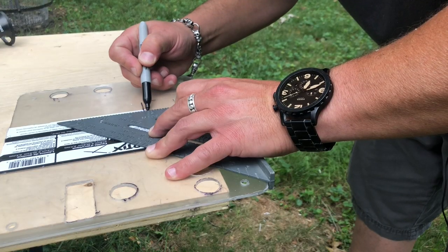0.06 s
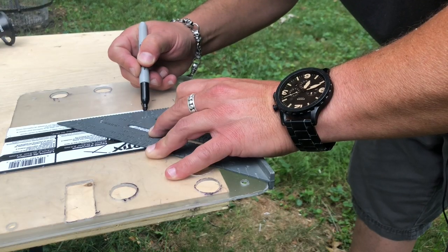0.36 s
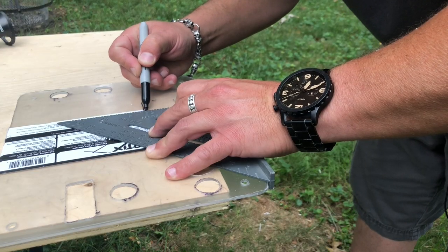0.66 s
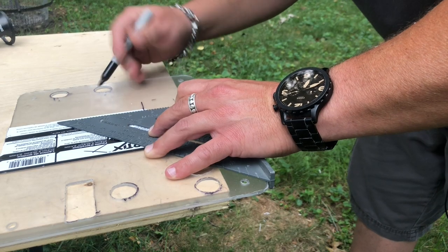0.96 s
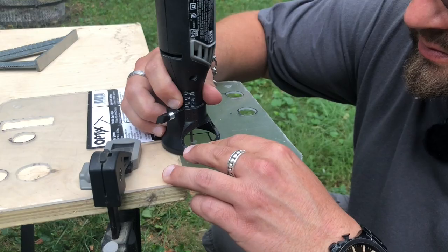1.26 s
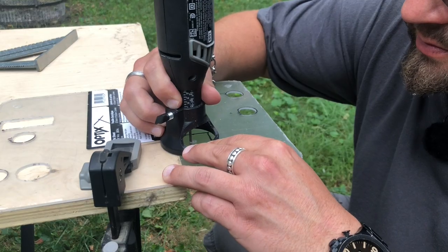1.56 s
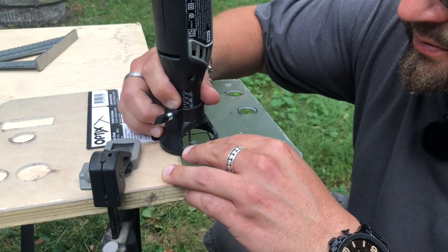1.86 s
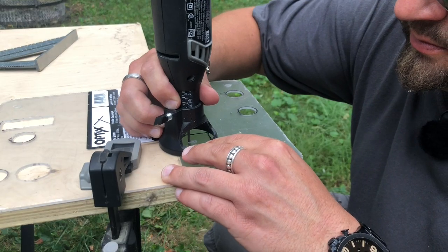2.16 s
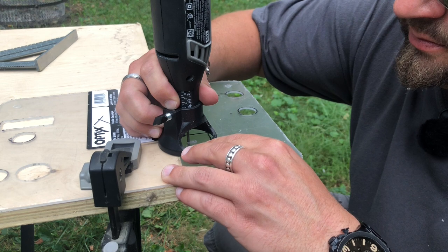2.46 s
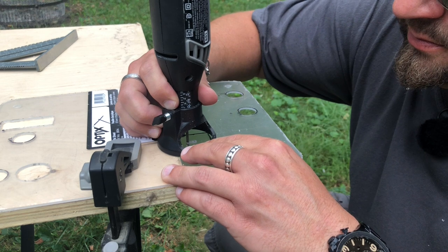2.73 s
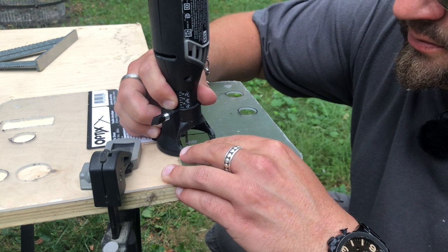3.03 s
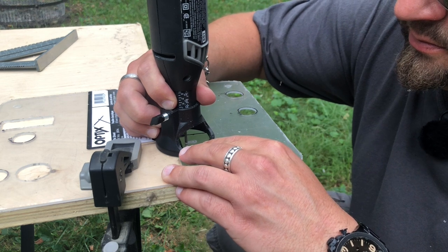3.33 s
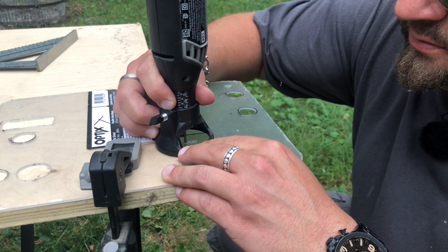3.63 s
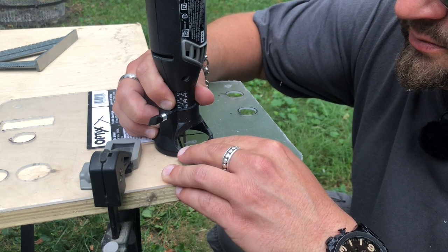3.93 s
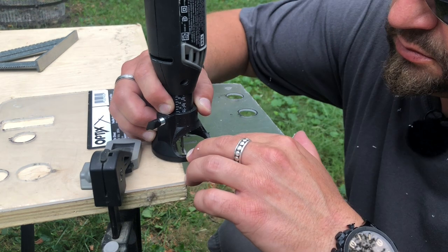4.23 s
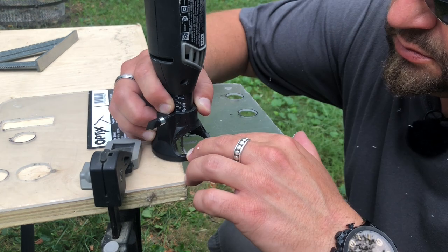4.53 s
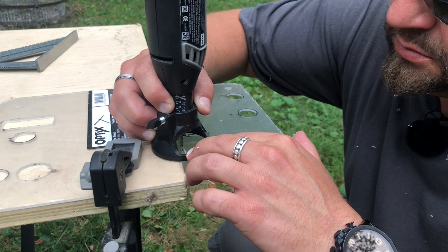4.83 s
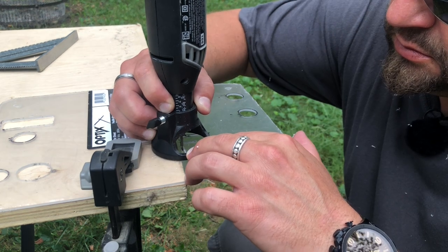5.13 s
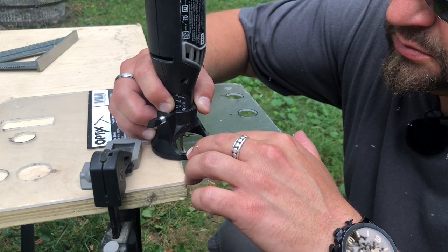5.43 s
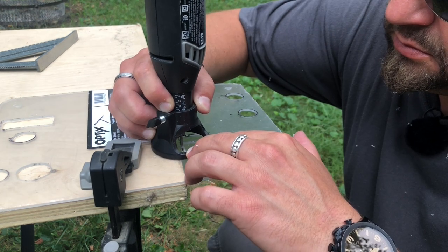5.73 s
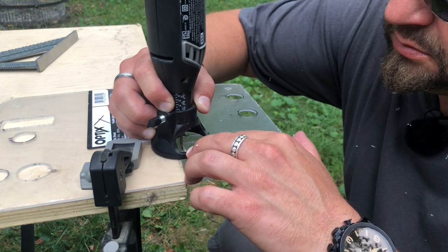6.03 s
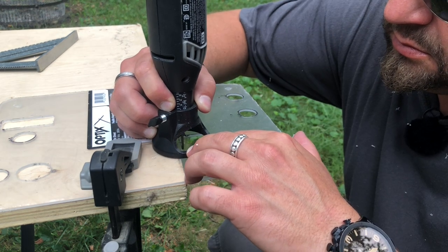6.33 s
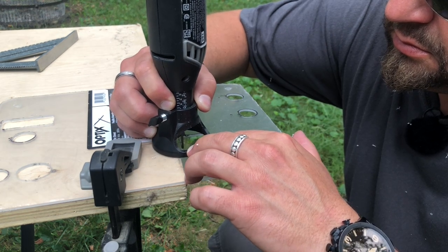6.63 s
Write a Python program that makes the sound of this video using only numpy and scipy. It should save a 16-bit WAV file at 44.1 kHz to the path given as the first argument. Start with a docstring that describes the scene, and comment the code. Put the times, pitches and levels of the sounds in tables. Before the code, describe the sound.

A felt pen ticks faintly on plastic, then a rotary tool cuts the panel with a high whine, rasping and squealing chatter.

```python
"""A rotary tool cuts a plastic panel in two abrupt passes at an outdoor workbench, after a felt pen
ticks and squeaks across it. The two-fluted bit strikes twice a turn and chatters in the slot, so the
cut rasps and squeals and the sheet rings. The second pass is smoother; the bit catches, breaks free
and grazes the rim while the unloaded motor speeds up. A low outdoor rumble lies underneath."""
import sys
import numpy as np
from scipy import signal
from scipy.fft import rfft, irfft, next_fast_len
from scipy.io import wavfile
from scipy.ndimage import uniform_filter1d

SR = 44100
rng = np.random.default_rng(int(sys.argv[2]) if len(sys.argv) > 2 else 0)


def put_to_file(sound):
    """Save the sound as 16-bit audio at rate SR, in the file named by the first command-line argument."""
    columns = np.atleast_2d(sound).T  # one column per channel
    safe = np.clip(columns, -1, 1)
    whole_steps = np.round(safe * 32767)
    wavfile.write(sys.argv[1], SR, whole_steps.astype(np.int16))


N = 303584
T = np.arange(N) / SR
START_S, SECOND_S, FREE_S, STOP_S = 1.192, 4.232, 6.17, 6.768  # tool in, second pass, bit free, tool out


def amp(db):
    """Decibels to gain."""
    return 10 ** (np.asarray(db) / 20)


def unit(x):
    """Scales to rms 1."""
    return x / np.sqrt(np.mean(x ** 2) + 1e-20)


def curves(rows):
    """Breakpoint envelopes, one for each column after the time."""
    times, *columns = np.transpose(rows)
    return [np.interp(T, times, column) for column in columns]


def between(start_s, end_s):
    """A gate with 9 ms fades."""
    return np.clip((T - start_s) / .009 + .5, 0, 1) * np.clip((end_s - T) / .009 + .5, 0, 1)


def swell(peak_s, half_s):
    """A bell-shaped envelope of height 1."""
    return np.exp(-((T - peak_s) / half_s) ** 2)


def since(start_s):
    """Seconds since start_s, zero before it."""
    return np.maximum(T - start_s, 0)


def noise():
    """White noise of rms 1."""
    return rng.standard_normal(N)


def wander(hz):
    """Random modulation of rms 1, up to about hz."""
    size = next_fast_len(N)
    f = np.fft.rfftfreq(size, 1 / SR)
    return unit(irfft(rfft(noise(), size) / (1 + (f / hz) ** 4), size)[:N])


def colour(x, eq, modes=(), size=4096):
    """A minimum-phase EQ: a broad curve with ringing resonances on top."""
    f = np.fft.rfftfreq(size, 1 / SR)
    hz, db = np.transpose(eq)
    shape = np.interp(np.log(f + 1), np.log(hz), db)
    for centre, width, boost in modes:
        shape = shape + boost / (1 + (2 * (f - centre) / width) ** 2)
    log_gain = np.log(amp(np.r_[shape, shape[-2:0:-1]]))
    taps = np.fft.ifft(np.exp(np.conj(signal.hilbert(log_gain)))).real
    return signal.oaconvolve(x, taps)[:N]


def tones(turns, harmonics, waver_db):
    """Sines locked to the shaft, each wavering in level by itself."""
    out = 0
    for harmonic, db in harmonics:
        gain = np.sqrt(2) * amp(db + waver_db * wander(10.6))
        out = out + gain * np.sin(2 * np.pi * (harmonic * turns + rng.random()))
    return out


# outdoor bed EQ: freq_hz, gain_db
YARD_EQ = [(25, -8), (55, -3.5), (105, 1), (180, -10.5), (280, -4.5), (450, -19), (1000, -25.5),
           (3000, -33.5), (7300, -30.5), (15500, -45)]

def yard(level_db=-59.5, duck_db=-13):
    """A low outdoor rumble, ducked while the tool runs."""
    return amp(level_db + duck_db * between(START_S, STOP_S)) * unit(colour(noise(), YARD_EQ))


# felt-tip strokes: start_s, length_s, pitch_hz, level_db
PEN_STROKES = [(.012, 0.038, 4870, -67), (.512, .025, 4800, -71), (.555, .03, 4800, -69),
               (.608, 0.042, 4900, -69)]

def pen_squeaks():
    """The felt sticks and slips on the plastic, falling in pitch through each stroke."""
    out = 0
    for start_s, length_s, pitch_hz, level_db in PEN_STROKES:
        stroke = np.clip((T - start_s) / length_s, 0, 1)
        glide_hz = pitch_hz * (1 - .09 * (stroke - .5) + .015 * wander(400))
        out = out + amp(level_db) * np.sin(np.pi * stroke) * np.sin(2 * np.pi * np.cumsum(glide_hz) / SR)
    return out


# soft thumps: start_s, level_db, pitch_hz
PANEL_BUMPS = [(0.087, -49, 110), (6.834, -49, 151), (6.855, -55, 106)]

def panel_bumps(decay_s=.013):
    """Hands bump the panel, which gives a low, damped note."""
    return sum(amp(db) * np.exp(-since(s) / decay_s) * np.sin(2 * np.pi * hz * since(s))
               for s, db, hz in PANEL_BUMPS)


# ticks and brushes: start_s, level_db, t60_s
PANEL_TICKS = [(0.181, -52, .018), (.4704, -63, .06), (.6206, -60, .05), (.7897, -65, .02),
               (0.841, -58, .025), (.858, -62, .07), (1.0226, -58.5, 0.054), (1.079, -61, 0.011),
               (1.1085, -58, .015), (1.1544, -58, 0.052), (6.776, -65.5, 0.94)]
# their EQ: freq_hz, gain_db
TICK_EQ = [(500, -6), (2500, -7.5), (5000, -1), (6200, -8), (7400, -2.5), (13500, -15), (16000, -27)]

def panel_ticks():
    """Pen and hand touch the plastic in bright, decaying bursts of noise."""
    envelope = sum(amp(db - 60 * since(s) / t60_s) * (T >= s) for s, db, t60_s in PANEL_TICKS)
    return envelope * unit(colour(noise(), TICK_EQ))


# flute blows under load in each pass, two to a turn: time_s, rate_hz
FIRST_BLOW_RATE = [(1.22, 689), (1.37, 686.7), (1.82, 687.3), (2.02, 682.7), (3.9, 691.5), (4.01, 696),
                   (4.2, 697)]
SECOND_BLOW_RATE = [(4.27, 687.1), (5.184, 686), (6.068, 691.6), (6.17, 699.5)]

def shaft_speed(run_up_hz=35, run_up_s=.36):
    """Turns per second: the load holds the motor down until the bit breaks free."""
    blows_hz, = curves([*FIRST_BLOW_RATE, *SECOND_BLOW_RATE])
    return blows_hz / 2 + run_up_hz * (1 - np.exp(-since(FREE_S) / run_up_s))


# motor and fan, loaded bit, unloaded bit: shaft_harmonic, level_db
WHIRR_TONES = [(8, -74), (12, -67), (21, -67), (23, -66)]
HUM_TONES = [(2, -52)]
IDLE_TONES = [(1, -72.5), (2, -71.5), (3, -64)]
# cooling air EQ: freq_hz, gain_db
AIR_EQ = [(100, -26), (500, 2), (1100, 0), (2600, 0.5), (3500, -7), (5900, 6), (7500, 4), (8800, -14),
          (12000, -7), (15500, -27)]

def motor(turns, speed_hz, air_db=-52, whistle_load_db=4.5, thrum_db_per_hz=1.8):
    """Motor tones and cooling air; as the load lets go, the hum gives way to a higher idle tone."""
    load = np.interp(speed_hz, [349, 353], [1, 0])
    whirr = tones(turns, WHIRR_TONES, waver_db=1)
    whistle = amp(whistle_load_db * load) * tones(turns, [(24, -52.5)], waver_db=1)
    hum = load * tones(turns, HUM_TONES, waver_db=1.3)
    strain = amp(thrum_db_per_hz * (344.3 - speed_hz))  # grows as the motor slows
    thrum = strain * tones(turns, [(1, -64.5)], waver_db=2.5)
    idle = (1 - load) * tones(turns, IDLE_TONES, waver_db=2)
    air = amp(air_db) * unit(colour(noise(), AIR_EQ))
    return (whirr + whistle + hum + thrum + idle + air) * between(START_S, STOP_S)


def chatter(depth, rate_hz, unevenness):
    """The tool bounces in the slot: each bite builds up, drags the bit back and lets go."""
    angle = 2 * np.pi * np.cumsum(rate_hz * np.exp(unevenness * wander(19.7))) / SR
    bite = depth * np.tanh(1.3 * (np.cos(angle) + .6 * np.sin(2 * angle)))
    drag = depth * np.sin(angle)
    return bite, drag


def whirl_lag(depth, whirl_hz=6):
    """Turns lost against the shaft as the chattering bit rolls backwards round the slot."""
    return np.cumsum(whirl_hz * depth) / SR


def sheet_chirp(x, delay_at_1khz_s=.022, size=4096):
    """Bending waves travel faster at high pitch, so the sheet smears each blow into a chirp."""
    f = np.fft.rfftfreq(size, 1 / SR)
    phase = 4 * np.pi * delay_at_1khz_s * np.sqrt(1000 * f)
    return signal.oaconvolve(x, irfft(np.exp(-1j * phase)))[:N]


def flutes(turns, lopsided, scatter_db, jitter_s, scrape_db):
    """Two blows a turn, one harder than the other, each followed by the scrape of a chip."""
    cycles = 2 * turns
    count = int(cycles[-1])
    scatter, late = rng.standard_normal((count, 2)).T
    force = amp(scatter_db * scatter) * (1 + lopsided * (-1) ** np.arange(count))
    at = (np.interp(np.arange(count), cycles, T) + jitter_s * late) * SR
    near = at.astype(int)[:, None] + np.arange(-5, 7)
    offset = near - at[:, None]
    clicks = force[:, None] * np.sinc(offset) * np.sinc(offset / 6)  # placed between samples
    blows = np.bincount(np.clip(near, 0, N - 1).ravel(), clicks.ravel(), N)
    chips = noise() * (1.4 + np.exp(-(cycles % 1) / .3))
    return sheet_chirp(unit(blows)) + amp(scrape_db) * unit(chips)


def rasp_and_ring(body, bite, rasp_db, ring_db, rasp_throb_db, ring_throb_db, crossover_hz=3300):
    """The struck sheet rings below the crossover and rasps above it; bites can pump each band."""
    low, high = (signal.butter(4, crossover_hz, kind, fs=SR, output="sos") for kind in ("low", "high"))
    ring = signal.sosfilt(low, body) * amp(ring_throb_db * bite + 1.82 * wander(61))
    rasp = signal.sosfilt(high, body) * amp(rasp_throb_db * bite + 2.14 * wander(47))
    return amp(ring_db) * unit(ring) + amp(rasp_db) * unit(rasp)


def squeal(drive, bite, pitch_hz=4777, width_hz=106, throb_db=9):
    """The bit's bending mode flares at every bite, levelled over half a second."""
    mode = signal.lfilter(*signal.iirpeak(pitch_hz, pitch_hz / width_hz, SR), drive)
    flaring = mode * amp(throb_db * bite)
    return flaring / np.sqrt(uniform_filter1d(flaring ** 2, size=SR // 2) + 1e-12)


# the bit biting, and skipping on the surface: shaft_harmonic, relative_db
BITE_TONES = [(8, -20.5), (10, -21), (12, -13), (15, -13.5), (18, -17), (21, -25.5), (22, -13)]
SKIP_TONES = [(6, -11), (8, -15), (18, -9)]

def scream(tip, bite, skip_depth, throb_db=6):
    """Overtones flare with every bite, with an extra layer while the bit skips."""
    biting = tones(tip, BITE_TONES, waver_db=1.5)
    skipping = skip_depth * tones(tip, SKIP_TONES, waver_db=2)
    return amp(throb_db * bite) * (biting + skipping)


# whine at entry: shaft_harmonic, relative_db
ENTRY_TONES = [(6, -2.5), (8, -3.5), (12, 0), (16, -1.5), (18, -5.5), (22, -6)]
# whine at full depth: shaft_harmonic, level_db
SLOT_TONES = [(5, -46.5), (6, -44.5), (11, -50.5), (13, -47)]

def edge_whine(turns, whirl, even, buried, floor_db=-50.5, swell_db=-39):
    """The bit sings when it runs evenly on the edge; entry tones give way to slot tones as it sinks."""
    entry = tones(whirl + .0076 * wander(29), ENTRY_TONES, waver_db=3.5)
    smooth = tones(turns + .0028 * wander(35), [(4, -1.8)], waver_db=-.2)
    slot = tones(turns + .005 * wander(30), SLOT_TONES, waver_db=3)
    gain = amp(floor_db) + amp(swell_db) * even
    return gain * (smooth + (1 - buried) * entry) + (.5 + .5 * buried) * slot


# base faders of the first pass: time_s, rasp_db, ring_db
FIRST_FADERS = [(1.23, -27, -33.5), (1.41, -29.5, -35), (1.52, -26.5, -35), (1.6, -31, -36),
                (2.04, -27, -33.5), (2.16, -30, -39), (2.2, -28, -34.5), (4.07, -31.5, -38.5),
                (4.21, -30, -36.5)]
# its EQ: freq_hz, gain_db
FIRST_EQ = [(200, -31.5), (750, -29), (1000, -5), (1400, -13.5), (2000, -5), (3400, -11.5), (4200, -3.5),
            (6500, 2), (8800, 0), (10000, -4.5), (12200, -2), (13400, -12.5), (14300, -24), (16000, -17)]
# resonances of bit and sheet: pitch_hz, width_hz, boost_db
FIRST_RESONANCES = [(1084, 360, 0.5), (1885, 63, 7.5), (2700, 140, 0), (4160, 18, 7), (4673, 330, 10.5),
                    (6105, 140, 4), (7280, 220, 2)]
# the bit runs evenly, so the whine swells and the chatter calms: peak_s
EVEN_RUNS = [1.28, 1.851, 2.019, 2.268, 2.511, 2.7, 2.871, 3.15, 3.349, 3.54, 3.74]
# the bit lifts off the edge for an instant: time_s, dip_db
BIT_LIFTS = [(1.215, -10), (1.391, -10), (1.656, -10), (2.135, -1), (2.465, -5)]

def first_pass(turns, sink_s=1.77, skip_hz=41, slot_hz=22.95, drag_turns=.02, slip_turns=.0071):
    """Hard chatter: the bit skips fast on the surface, then bounces more slowly in the slot."""
    push_db = 1.5 * swell(3.03, .25)  # the hand leans in once
    rasp_db, ring_db = curves(FIRST_FADERS)
    rasp_db = rasp_db + push_db
    even = sum(swell(s, .062) for s in EVEN_RUNS) * amp(-2.5 * since(START_S))  # fades as the bit sinks
    buried = np.interp(T, [2.0, 3.8], [0, 1])
    skipping = between(START_S, sink_s)
    depth = .9 * amp(push_db) * (1 - .6 * even)
    bite, drag = chatter(depth, slot_hz + (skip_hz - slot_hz) * skipping, unevenness=.27)
    whirl = turns - whirl_lag(depth)
    tip = whirl - drag_turns * drag + slip_turns * depth * wander(35)
    drive = flutes(tip, lopsided=.5, scatter_db=2, jitter_s=.9e-5, scrape_db=-1.5)
    body = colour(drive, FIRST_EQ, FIRST_RESONANCES)
    cut = rasp_and_ring(body, bite, rasp_db - 2, ring_db - 1.7 + even, rasp_throb_db=3, ring_throb_db=2.2)
    bending = amp(rasp_db - 6 - 4.5 * even) * squeal(drive, bite)
    flare = (1 - .79 * buried) * amp(rasp_db - 2) * scream(tip, bite, skipping * depth)
    whine = edge_whine(turns, whirl, even, buried)
    contact = amp(sum(db * swell(s, .0049) for s, db in BIT_LIFTS))
    return (cut + bending + flare + whine) * contact * between(START_S, SECOND_S)


# whine of the second pass: shaft_harmonic, relative_db
SHEET_TONES = [(3, -23), (4, -7), (5, -7), (6, -5), (7, -11), (8, -26)]
# cries: peak_s, half_length_s, shaft_harmonic, boost_db
SLIVER_CRIES = [(5.98, .05, 4, 7), (6.02, 0.071, 3, 19), (6.2, .035, 4, 15.5), (6.19, 0.038, 3, 20)]

def sheet_song(turns):
    """The sheet sings at the shaft's overtones; single ones cry out as the last sliver gives way."""
    out = 0
    for harmonic, db in SHEET_TONES:
        cry_db = sum(boost * swell(s, half_s) for s, half_s, k, boost in SLIVER_CRIES if k == harmonic)
        out = out + amp(cry_db) * tones(turns, [(harmonic, db)], waver_db=1.63)
    return out


# EQ of the second pass: freq_hz, gain_db
SECOND_EQ = [(200, -28), (750, -15), (1300, -2.5), (2600, -4.5), (3700, -9), (4500, -5.5), (5400, 4.5),
             (6800, 1.5), (7600, -1), (9200, 0.5), (10300, -8), (13000, -10), (15500, -23.5)]
# resonances of bit and sheet: pitch_hz, width_hz, boost_db
SECOND_RESONANCES = [(1980, 138, 16.8), (2688, 160, 9.1), (4990, 46, 3.5), (8000, 250, 3.6)]
# grinding in the slot, and whine on the rim: shaft_harmonic, relative_db
GRIND_TONES = [(10, -22), (12, -21), (14, -19.5), (15, -14.5), (17, -13), (18, -18.5), (19, -14.5)]
RIM_TONES = [(3, -9.5), (4, -6.5), (5, -4), (6, -12), (7, -12.5), (8, -8)]
# screech of the catch: shaft_harmonic, level_db
CATCH_TONES = [(10, -50), (11, -52), (14, -44), (16, -45), (19, -43)]

def second_pass(turns, rasp_db=-33.5, ring_db=-34.5, catch_s=5.945, drag_turns=.017, slip_turns=.016):
    """A smoother, ringing cut: the bit catches near the end of the slot, then breaks free."""
    ease_db = -3 * since(5.15)  # the hand eases off
    pressure_db = ease_db + .94 * np.cos(2 * np.pi * (T - catch_s) / .1978)  # and rocks the tool
    held = amp(-162 * since(FREE_S - .023))  # the last sliver yields just before it parts
    catch, graze = swell(catch_s, .036), rim_grazes()
    rasp = amp(rasp_db) * (held * amp(pressure_db + 2.2 * catch) + graze)
    ring = amp(ring_db) * held * amp(pressure_db)
    rim = amp(ring_db) * graze
    depth = .62 * held * amp(ease_db)
    bite, drag = chatter(depth, rate_hz=26.22, unevenness=.55)
    tip = turns - whirl_lag(depth) - drag_turns * drag + slip_turns * depth * wander(37)
    drive = flutes(tip, lopsided=.72, scatter_db=0, jitter_s=1.3e-5, scrape_db=2.5)
    body = colour(drive, SECOND_EQ, SECOND_RESONANCES)
    high_db, low_db = 20 * np.log10([rasp, ring + amp(-4) * rim])
    cut = rasp_and_ring(body, bite, high_db - .87, low_db - 3, rasp_throb_db=0, ring_throb_db=3.5)
    sway = turns + .005 * wander(30)
    whine = ring * sheet_song(sway) + rim * tones(sway, RIM_TONES, waver_db=0)
    grind = rasp * tones(tip + .0042 * wander(45), GRIND_TONES, waver_db=3)
    screech = catch * tones(tip + .006 * wander(61), CATCH_TONES, waver_db=-2)
    return (cut + whine + grind + screech) * between(SECOND_S, STOP_S)


# touches on the rim: peak_s, attack_s, relative_db
RIM_TOUCHES = [(6.62, 0.28, -10), (6.719, 0.058, -11.5)]

def rim_grazes(release_s=.0068):
    """Envelope of the free bit grazing the rim harder and harder, then leaving it."""
    touches = sum(amp(db) * np.exp(-np.maximum(s - T, 0) / attack_s - since(s) / release_s)
                  for s, attack_s, db in RIM_TOUCHES)
    return touches * between(FREE_S, STOP_S)


def scene():
    """One shaft angle drives the motor and both cuts, mixed in mono with the handling and the yard."""
    speed_hz = shaft_speed()
    turns = np.cumsum(speed_hz * (1 + .000896 * wander(11.98))) / SR
    tool = first_pass(turns) + second_pass(turns) + motor(turns, speed_hz)
    handling = panel_ticks() + pen_squeaks() + panel_bumps()
    return (tool + handling + yard())[None]


def record(dry):
    """A steep high cut at 15.85 kHz."""
    high_cut = signal.firwin(511, 15850, window=("kaiser", 9), fs=SR)
    return signal.oaconvolve(dry, high_cut[None], "same")


dry = scene()
out = record(dry)
put_to_file(out)
```